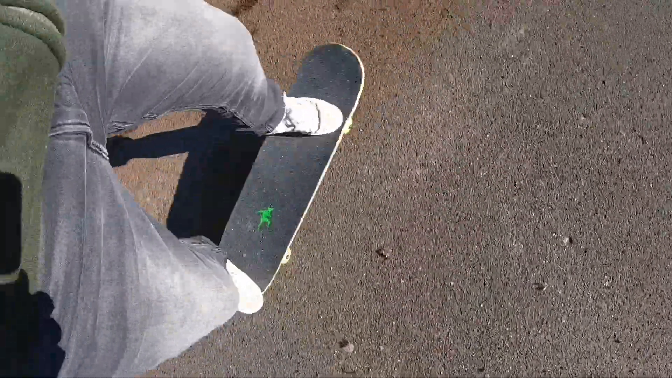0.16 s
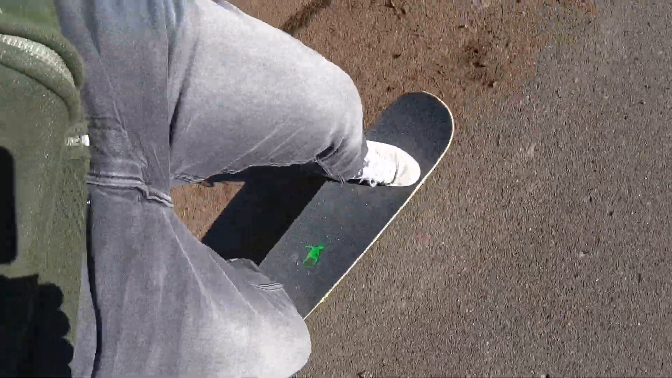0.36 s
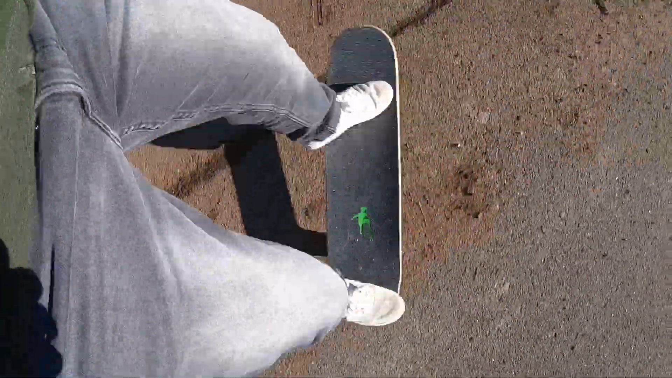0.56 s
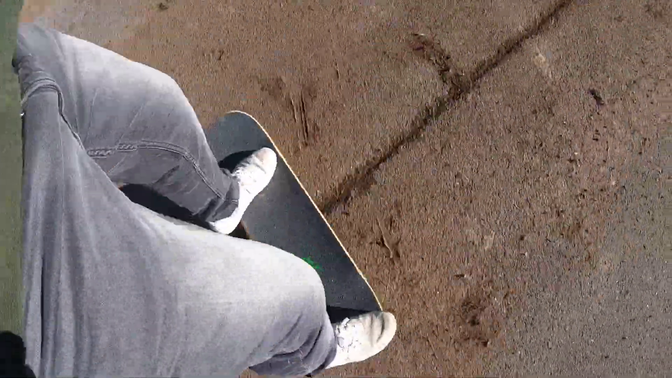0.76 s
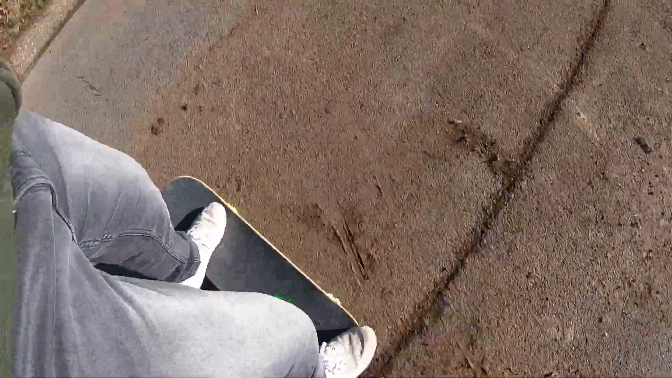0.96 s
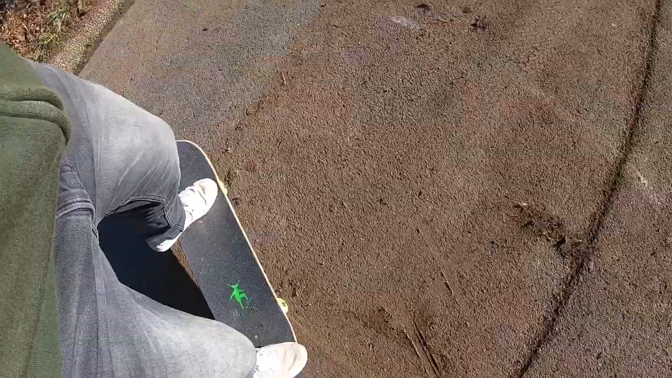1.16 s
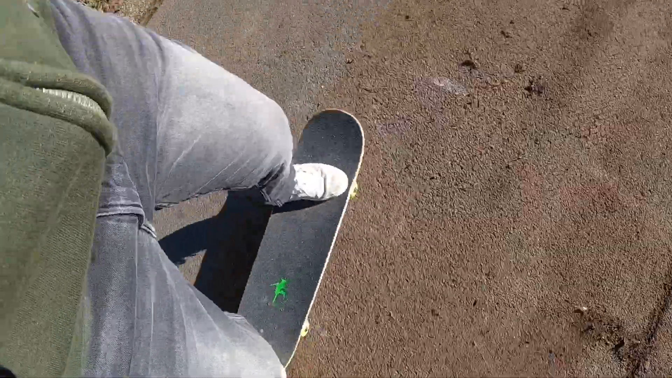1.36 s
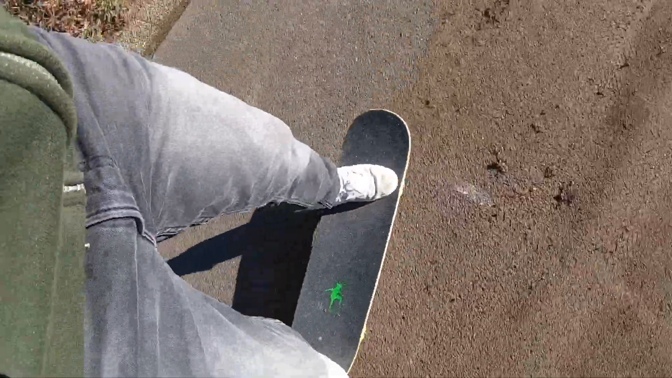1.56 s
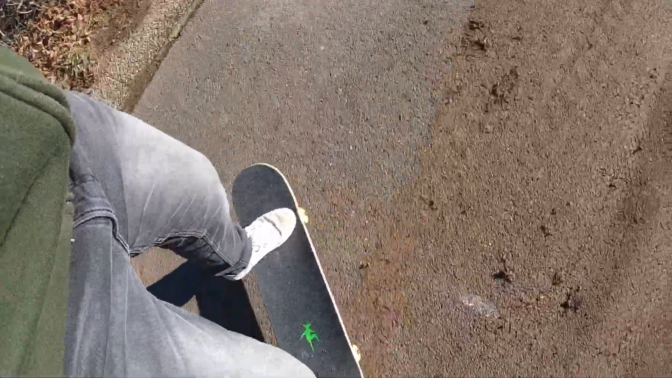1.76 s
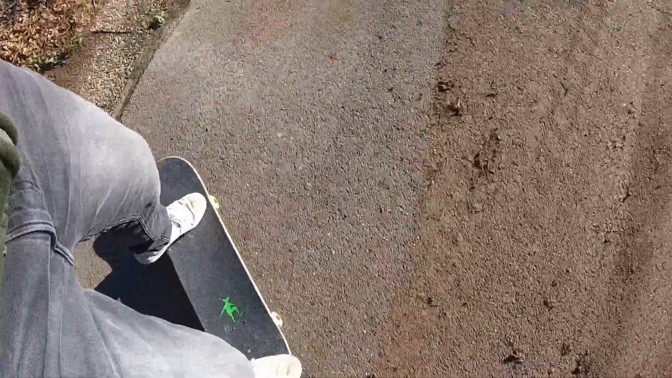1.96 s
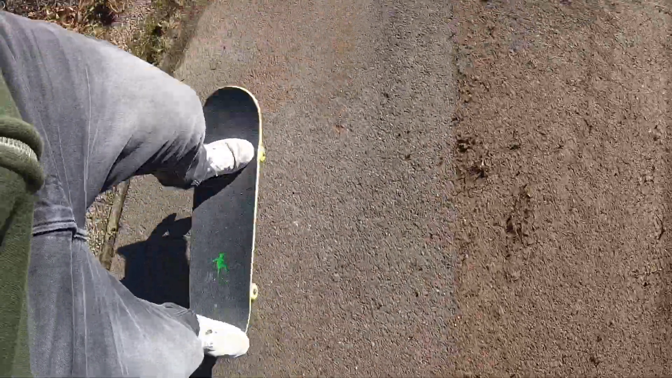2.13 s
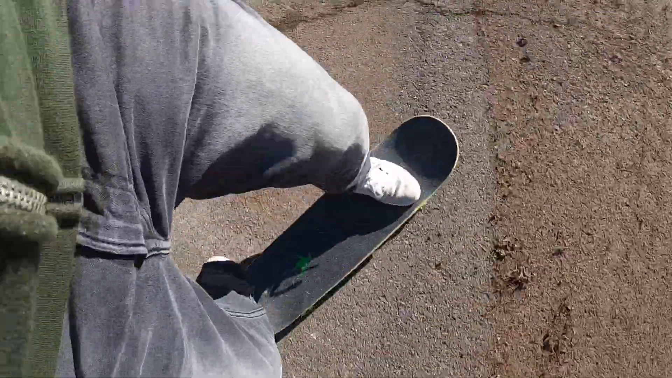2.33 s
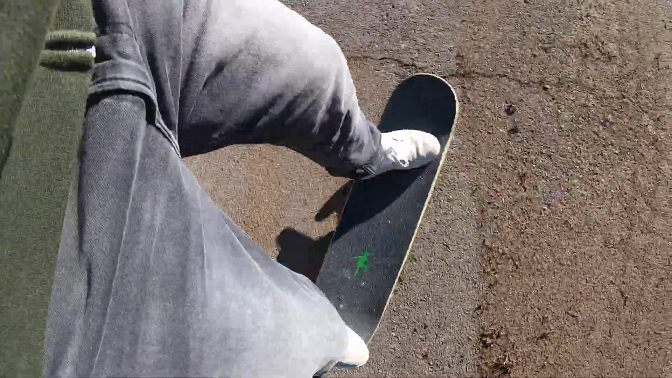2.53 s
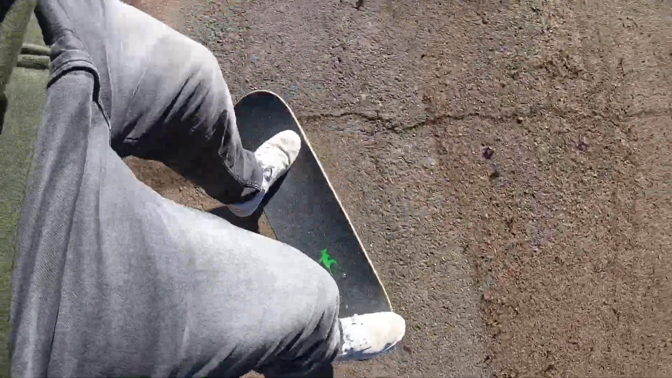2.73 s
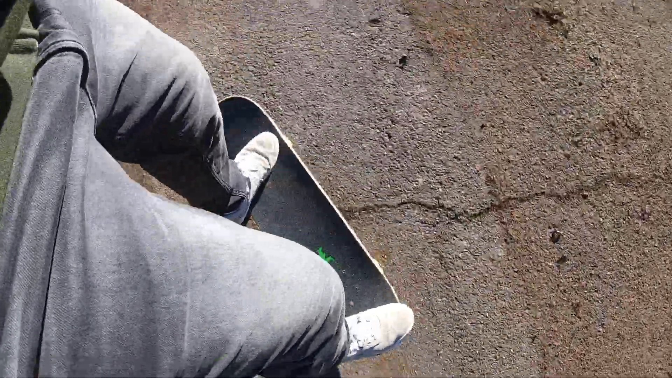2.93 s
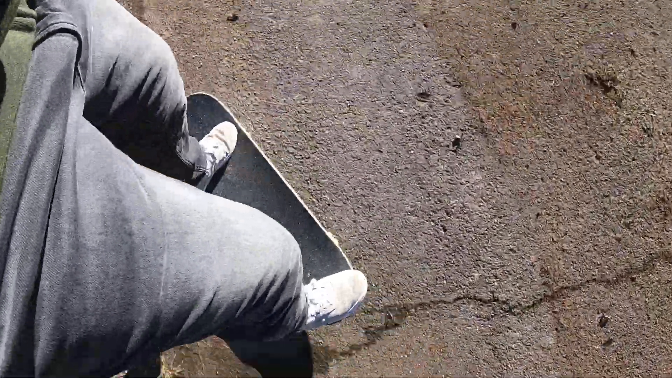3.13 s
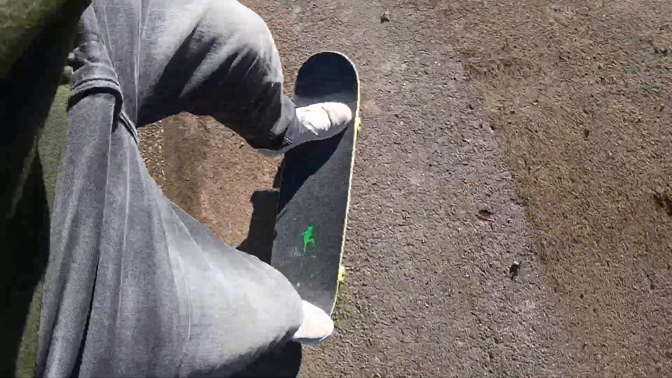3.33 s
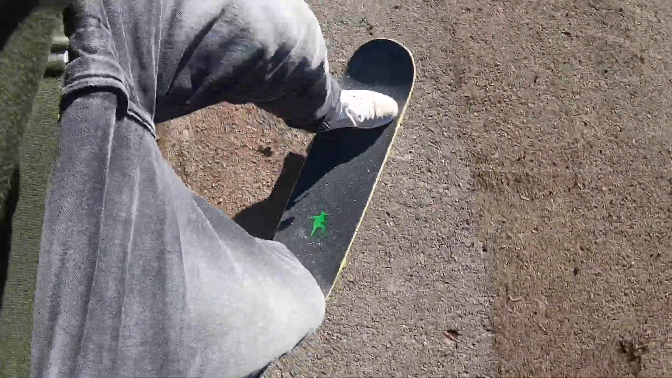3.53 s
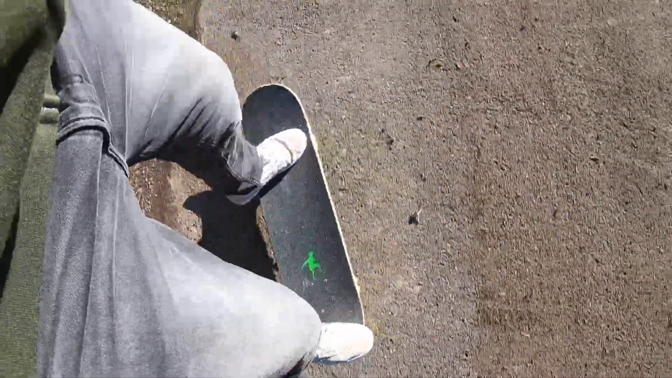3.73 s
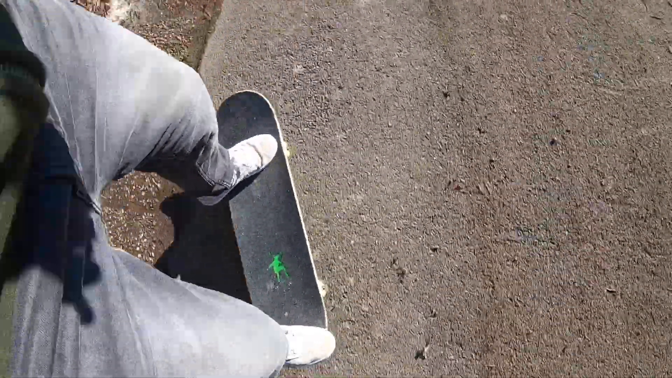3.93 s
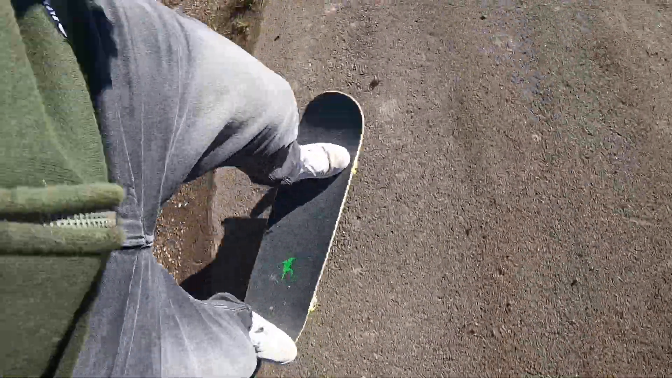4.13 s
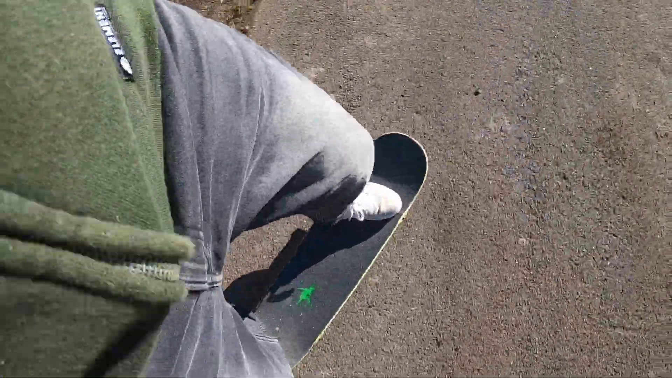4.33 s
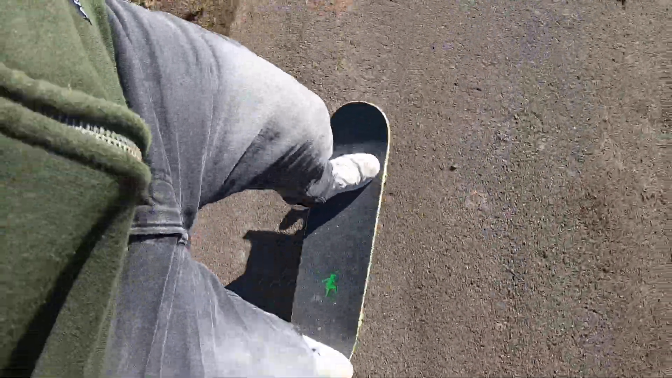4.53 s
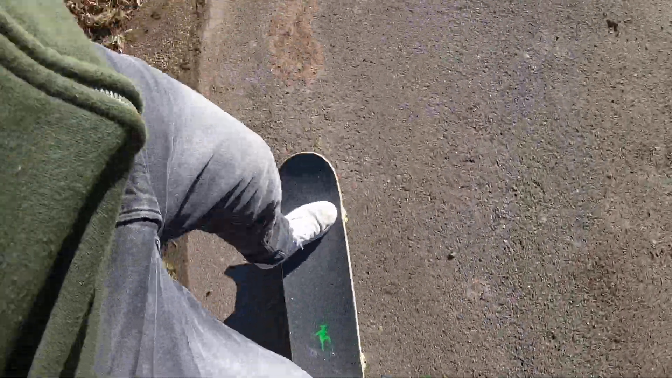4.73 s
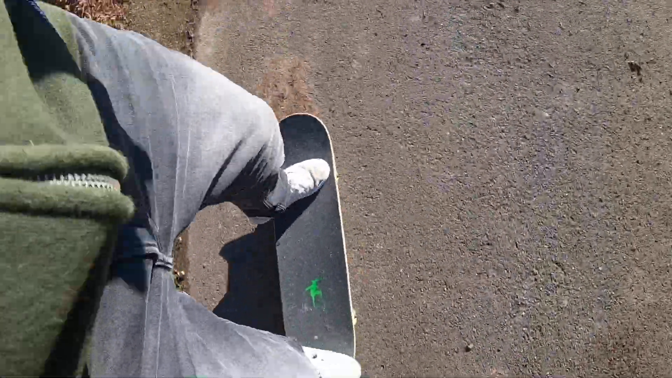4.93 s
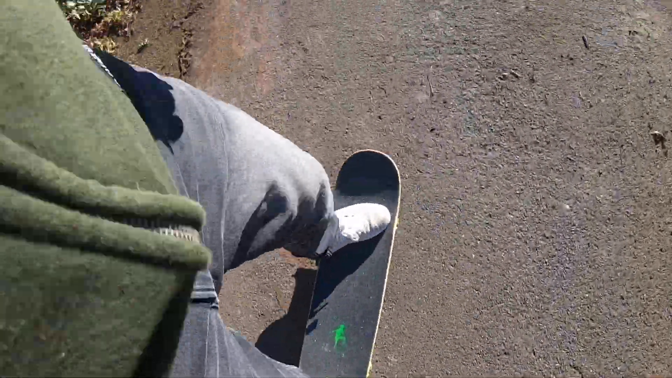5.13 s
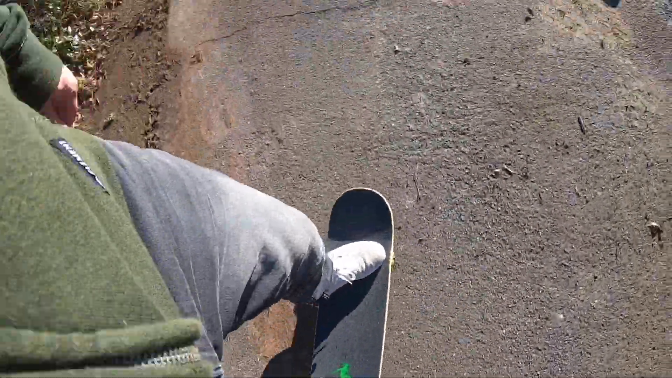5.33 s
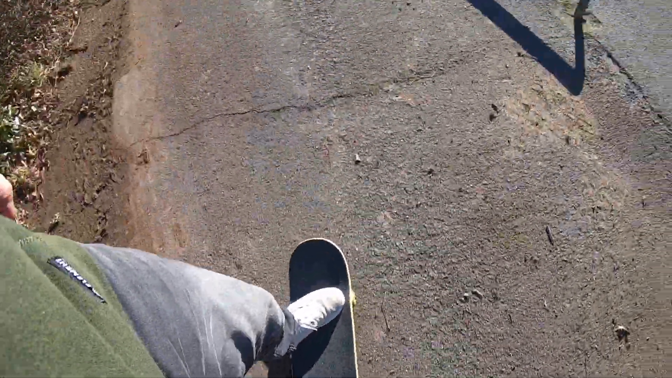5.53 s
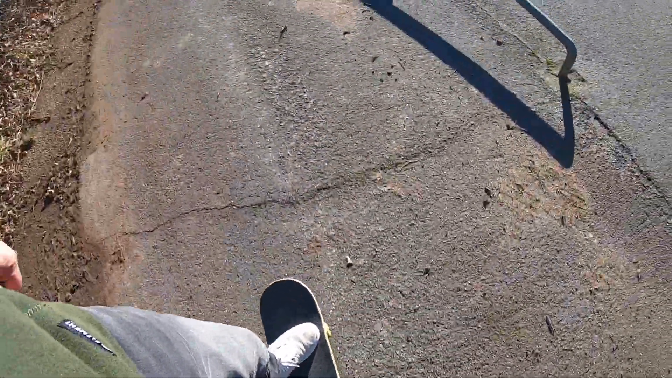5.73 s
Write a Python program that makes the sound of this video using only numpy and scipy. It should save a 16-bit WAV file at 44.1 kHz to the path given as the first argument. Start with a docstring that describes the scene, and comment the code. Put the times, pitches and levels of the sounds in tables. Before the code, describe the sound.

A skateboard is already rolling over rough asphalt, heard outdoors through a close stereo microphone at the rider's chest. The wheels give a low hum while the wooden deck drums over the coarse surface. The sound swells about twice a second as the board carves, rising slightly in pitch with a rasping scrub and a fine crunch of grit. Loose trucks knock and clack between turns, often in quick clusters, at about 0.2, 0.7, 1.4 to 1.8, 2.4, 2.7, 3.4, 3.7, 4.3, 4.6 and 5.1 seconds. Longer carves come around 1, 2 and 3 seconds, the last with a deeper rumble. Small stones tick away now and then, most clearly at 3.6 seconds. Light wind buffets the microphone near 0.3, 1.5 and 5.5 seconds. After about 5.2 seconds the rolling grows softer, with a faint high rub from a wheel.

```python
"""Skateboard carving on rough asphalt

Out on the road, with a close stereo microphone at the rider's chest. The grain of the asphalt bounces
the wheels and drums on the deck; in each turn the wheels scrub and crunch grit. Between turns the load
comes off and the loose trucks knock over to the other side. A little headwind buffets the microphone."""
import sys
import numpy as np
from scipy import signal
from scipy.fft import rfft, irfft, next_fast_len
from scipy.io import wavfile
from scipy.ndimage import uniform_filter1d, map_coordinates

SR = 44100
rng = np.random.default_rng(int(sys.argv[2]) if len(sys.argv) > 2 else 0)


def store_pcm(level_fs):
    """Save levels as 16-bit WAV."""
    pcm = np.round(np.clip(level_fs, -1, 1) * 32767).astype(np.int16)
    wavfile.write(sys.argv[1], SR, np.atleast_2d(pcm).T)


N = 254889


def amp(db):
    """Decibels to gain."""
    return 10 ** (np.asarray(db) / 20)


def unit(x):
    """Scaled to rms 1."""
    return x / np.sqrt(np.mean(x ** 2) + 1e-20)


def along(points, hz):
    """(Hz, value) points joined on a log axis."""
    f, v = np.transpose(points)
    return np.interp(np.log(hz + 1), np.log(f + 1), v)


def wobble(rate):
    """A smooth random curve, rate knots a second."""
    return map_coordinates(rng.standard_normal(int(N * rate / SR) + 4), [np.arange(N) * rate / SR])


def swells(rows):
    """Gain of (peak s, dB, rise s, fall s) swells; rise and fall each span 20 dB."""
    t = np.arange(N) / SR
    return sum(amp(db - 20 * np.maximum((s - t) / rise, (t - s) / fall)) for s, db, rise, fall in rows)


def grains(rate, spread_db):
    """Random contacts of log-normal size, rate a second, as a middle and a side signal of rms 1."""
    size = (rng.random(N) < rate / SR) * amp(spread_db * np.clip(rng.standard_normal(N), -2, 2))
    return unit(size * rng.choice([-1, 1], (2, N)))


def filtered(x, response):
    """x times a complex response of frequency."""
    m = next_fast_len(N + SR // 2, True)
    return irfft(rfft(x, m) * response(np.fft.rfftfreq(m, 1 / SR)), m)[..., :N]


def coloured(x, spectrum, size=4096):
    """Causal filter with the shape of (Hz, dB) points and energy 1."""
    cepstrum = irfft(np.log(amp(along(spectrum, np.fft.rfftfreq(size, 1 / SR)))))
    cepstrum[1:size // 2] *= 2
    cepstrum[size // 2 + 1:] = 0
    kernel = irfft(np.exp(rfft(cepstrum)))
    return signal.oaconvolve(x, kernel[None] / np.linalg.norm(kernel), axes=1)[:, :N]


def resonated(x, modes, cutoff_hz, order):
    """x rings (Hz, width Hz, dB) modes of alternating sign, then is low-passed."""
    def response(hz):
        peaks = sum((-1) ** k * amp(db) * 1j * hz * width / (centre ** 2 - hz ** 2 + 1j * hz * width)
                    for k, (centre, width, db) in enumerate(modes))
        return peaks / (1 + (hz / cutoff_hz) ** order)
    return filtered(x, response)


def steadied(x):
    """Rms 1 with the slow chance swells evened out, as under a steady drive."""
    power = uniform_filter1d(uniform_filter1d(x[0] ** 2, size=2400), size=1600)
    return unit(x / np.sqrt(np.abs(power) + 0.13 * power.mean()))


def patchy(x, depth_db):
    """The colour drifts by depth_db as the contact patches and the rider's legs move."""
    spectra = signal.stft(x, nperseg=512)[2]
    drift = uniform_filter1d(rng.standard_normal(spectra.shape[1:]), size=3, axis=0)
    drift = uniform_filter1d(drift, size=18, axis=1, mode='wrap')
    return unit(signal.istft(spectra * amp(depth_db * unit(drift)), nperseg=512)[1][:, :N])


# Wind right on the microphone. Each row: frequency in Hz, relative level in dB.
WIND_SPECTRUM = [(15, -8), (36, -8), (70, 0), (100, -12.5), (180, -14), (600, -92)]
# Puffs of headwind. Each row: peak time in seconds, level in dB, rise and fall in seconds.
GUSTS = [(.32, -23, 0.028, 0.25), (1.51, -22.5, 0.11, 0.13), (3.93, -39, 0.72, 0.15),
         (4.48, -31.5, 0.21, 0.31), (5.46, -27.5, 0.16, 0.05)]

def headwind(breeze_db=-53):
    """The rider's own headwind flutters on each microphone port, partly on both at once."""
    eddies = rng.standard_normal((2, N)) + 0.25 * rng.standard_normal(N)
    return (amp(breeze_db) + swells(GUSTS)) * steadied(coloured(eddies, WIND_SPECTRUM))


# Pebbles flicked across the road. Each row: start in seconds, pitch in Hz, level in dB.
PEBBLES = [(0.821, 4530, -45), (1.818, 2790, -32.5), (2.807, 3340, -39.5), (3.563, 3290, -24),
           (3.57, 3230, -24), (4.758, 2760, -34.5)]

def pebbles():
    """Loose stones ping away from the wheels."""
    t = np.arange(SR // 10) / SR
    pings = np.zeros((2, N + SR))
    for s, hz, db in PEBBLES:
        rough_phase = np.cumsum(rng.normal(0, .11, (2, len(t))), axis=1)
        envelope = amp(db - 60 * t / 0.032) * (1 - np.exp(-t / 0.0007))
        pings[:, round(s * SR):][:, :len(t)] += envelope * np.sin(2 * np.pi * hz * t + rough_phase)
    return pings[:, :N]


# A wheel's high modes. Each row: frequency and width in Hz, relative level in dB.
WHEEL_MODES = [(4080, 280, 6), (5660, 350, -4.5), (6660, 480, -1)]
# Faint at chest height. Each row: peak time in seconds, level in dB, rise and fall in seconds.
SING_SWELLS = [(5.49, -53, .3, .2), (5.6, -49, .2, .1)]

def wheel_sing(chatter_db):
    """A wheel's edge rubs and sings near the end of the run."""
    ring = resonated(grains(4000, spread_db=7), WHEEL_MODES, cutoff_hz=9000, order=6)
    return swells(SING_SWELLS) * amp(chatter_db) * unit(ring)


# The deck's slowest bending mode. One row: frequency and width in Hz, relative level in dB.
FLEX_MODE = [(107.3, 14, 0)]
# A deep swell underfoot. One row: peak time in seconds, level in dB, rise and fall in seconds.
FLEX_SWELL = [(3.1, -34.5, 0.53, 1)]

def deck_flex(shake, deck_db):
    """The loaded deck sags and springs back between the trucks; otherwise it follows the drumming."""
    level = swells(FLEX_SWELL) + amp(deck_db - 33)
    return level * steadied(resonated(shake, FLEX_MODE, cutoff_hz=220, order=4))


# Fine hiss off the road. Each row: frequency in Hz, relative level in dB.
SAND_SPECTRUM = [(5000, -32), (8300, -11), (9200, -6.5), (10000, -1.5), (11500, -26), (14300, -25),
                 (16000, -32)]

def sand_spray(level_db):
    """A hard carve throws sand."""
    return amp(level_db) * unit(coloured(grains(9000, spread_db=4), SAND_SPECTRUM))


# Bright crunch at road level. Each row: frequency in Hz, relative level in dB.
GRIT_SPECTRUM = [(1500, -54), (3300, 10.5), (4100, 6), (5300, -2.5), (6700, 7), (8200, -13.5), (9400, 3.5),
                 (10300, -7.5), (11600, -28.5), (14300, -25), (16000, -45)]

def grit_crunch(level_db):
    """Loose grit crunches under the wheels in dense, tiny contacts."""
    return amp(level_db) * patchy(coloured(grains(12000, spread_db=6.4), GRIT_SPECTRUM), depth_db=0)


# The tones of a skid. Each row: frequency and width in Hz, relative level in dB.
SKID_MODES = [(1780, 186, -0.5), (2690, 194, -5), (3600, 220, -10.5)]

def wheel_skid(level_db):
    """Urethane slides sideways in a hard carve."""
    slide = resonated(grains(3000, spread_db=1.4), SKID_MODES, cutoff_hz=6000, order=4)
    return amp(level_db) * unit(slide)


# The wheels' rasp, heard from above. Each row: frequency in Hz, relative level in dB.
SCRUB_SPECTRUM = [(200, -10), (400, -22), (780, 6), (890, -16), (1020, -2.5), (1250, 3), (1650, -2.5),
                  (1950, -7), (2600, -8.5), (3050, -15), (3900, -21), (5000, -27.5), (8000, -34.5),
                  (16000, -56.5)]

def wheel_scrub(level_db):
    """The wheels scrub sideways over the asphalt's grain."""
    return amp(level_db) * patchy(coloured(grains(3500, spread_db=5.7), SCRUB_SPECTRUM), depth_db=3)


def stones(scrub_db):
    """Single stones stand proud of the asphalt and tick under the wheels."""
    ticks = coloured(grains(30, spread_db=6), SCRUB_SPECTRUM)
    brightened = filtered(ticks, lambda hz: 1 + 1j * hz / 2600)
    return amp(0.52 * (scrub_db + 34.5) - 47.5) * unit(brightened)


# The maple deck, below the microphone. Each row: frequency and width in Hz, relative level in dB.
DECK_MODES = [(303, 43, -5.5), (524.2, 39.2, 0.5), (618, 67, -3), (721, 51, -2.5), (1170, 294, -19.5)]

def deck_drumming(deck_db, road_db, growl_from_db=-22.5, growl_range_db=3.5):
    """The road drums on the deck; driven hard, it rings in narrower modes and growls."""
    narrow_modes = [(hz, width / 2, db) for hz, width, db in DECK_MODES]
    drum = steadied(resonated(grains(1800, spread_db=1.64), DECK_MODES, cutoff_hz=1500, order=2))
    growl = steadied(resonated(grains(1800, spread_db=4.1), narrow_modes, cutoff_hz=1200, order=2))
    pressed = np.clip((deck_db - growl_from_db) / growl_range_db, 0, 1)
    return amp(deck_db + road_db) * (np.sqrt(1 - pressed) * drum + np.sqrt(pressed) * growl)


# Hanger, washers and wheel cores. Each row: frequency in Hz, relative level in dB, seconds to fall 60 dB.
TRUCK_MODES = [(1060, 0, 0.041), (1320, -20, 0.12), (1470, -17, 0.0077), (1615, 3, 0.051),
               (2048, 11, 0.012), (2180, -6.5, 0.046), (2610, -9, 0.064), (3256, -9, 0.037),
               (3930, -21, 0.031)]
# Truck knocks and stones under a wheel, a leg and torso away. Each row: start in seconds, then
# relative levels in dB of truck clack, wheel thump, deck ring and grit tick.
KNOCKS = [(0.2027, -14.5, -18, -19, -26), (0.251, -17, -11.5, -17, -28.5), (.2605, -15, -38, -12, -26),
          (0.2931, -20, -17, -12.5, -40), (0.516, -15, -17, -30, -34), (0.7257, -13, -10.5, -11.5, -27.5),
          (0.9522, -17, -10.5, -19, -35), (1.385, -14.5, -30, -12.5, -21.5), (1.524, -54, -20, -30, -22),
          (1.5942, -16.5, -37, -9.5, -36), (1.7454, -11, -11.5, -9, -37), (1.759, -13, -15, -12, -27.5),
          (2.3699, -11.5, -15.5, -15, -23), (2.399, -16.5, -15, -14.5, -40), (2.500, -20.5, -22, -11, -42),
          (2.7247, -13, -13.5, -7.5, -34.5), (2.86, -29, -14.5, -27, -36), (3.417, -11, -20, -14, -20),
          (3.731, -9.5, -13.5, -11, -26.5), (3.7608, -16.5, -16, -9, -33), (3.876, -23, -18, -18, -46),
          (4.2518, -12, -25, -11.5, -22.5), (4.292, -29, -15, -11.5, -35), (4.487, -14, -44, -14, -31.5),
          (4.6485, -13.5, -20, -14, -31), (4.654, -16, -10.5, -6, -44),
          (5.1279, -10.5, -22.5, -15.5, -28.5)]

def knocks(thump_hz=192, hollow_hz=745):
    """Each blow clacks the truck, rings the deck and makes the board hop on its wheels."""
    t = np.arange(SR // 4) / SR
    rings, cracks, ticks = np.zeros((3, 2, N + SR))
    fade = lambda t60: amp(-60 * t / t60)
    tone = lambda hz, phase=0: np.sin(2 * np.pi * hz * t + phase)
    scatter_db = lambda: rng.uniform(-2.5, 2.5)
    thump = tone(thump_hz) * fade(0.059) * (1 - np.exp(-t / 0.0023))
    burst = np.exp(-(t / 0.0023) ** 2)  # a brief crunch
    buzz = amp(-12) * fade(.1)  # then the hardware buzzes out
    for s, clack_db, thump_db, deck_db, tick_db in KNOCKS:
        span = slice(round(s * SR), round(s * SR) + len(t))
        contact = 1 - np.exp(-t * amp(clack_db + 12) / 0.00033)  # weaker blows meet more softly
        # a sharp blow favours the higher bending modes
        wood = sum(amp(db + scatter_db()) * (hz / 600) ** 1.17
                   * tone(hz, rng.normal(0, 1)) * np.exp(-np.pi * width * t)
                   for hz, width, db in DECK_MODES)
        # only a hard slap twists the deck and brings out its hollow note
        hollow = amp(2.1 * deck_db + 3) * tone(hollow_hz) * fade(0.047)
        rings[0, span] += contact * (amp(thump_db + 5) * thump + amp(deck_db - 5) * wood + hollow)
        for hz, db, t60 in TRUCK_MODES:  # the point of contact shifts each mode's strength and sign
            strength = rng.choice([-1, 1], (2, 1)) * amp(clack_db - 10.5 + db + scatter_db())
            rings[:, span] += contact * strength * tone(hz * (1 + rng.normal(0, 0.031))) * fade(t60)
        crack, tick = contact * rng.standard_normal((2, 2, len(t)))
        cracks[:, span] += amp(clack_db - 1.5) * crack * (burst + buzz)
        ticks[:, span] += amp(tick_db - 2.5) * tick * (burst + .5 * buzz)
    return rings[:, :N] + coloured(cracks, SCRUB_SPECTRUM) + coloured(ticks, GRIT_SPECTRUM)


def wheel_bounce(shake, pitch_hz, load):
    """The board resonates on its springy wheels; hard-pressed wheels ring more purely."""
    carrier = np.exp(2j * np.pi * np.cumsum(pitch_hz) / SR)

    def ring(width_hz):
        motion = carrier * signal.lfilter([1], [1, -np.exp(-np.pi * width_hz / SR)], shake / carrier)
        # so small a board radiates little deep bass
        radiation = lambda hz: hz ** 6 / (hz ** 6 + 118 ** 6) / (1 + 1j * hz / 600)
        return steadied(filtered(motion.imag, radiation))

    return unit(load * ring(width_hz=10.5) + (1 - load) * ring(width_hz=190))


# Long and short carves down the road, each lasting until the next. Each row: start, peak of the rider's
# weight and peak of the sideways bite in seconds, hold (1 lets go evenly, 4 late), coasting offset in dB,
# top bounce pitch in Hz, then peak levels in dB of bounce, drumming, scrub and grit.
CARVES = [(-.17, 0.123, .16, 1.36, 12, 242, -21.5, -21, -25, -47),
          (0.334, 0.482, .52, 2.04, 1, 227.6, -23.5, -21, -30.5, -59),
          (0.8, 1.044, 1.32, 8.6, 7.5, 237, -28.5, -24.5, -28, -50),
          (1.449, 1.59, 1.61, 0.86, -4, 206, -20, -23, -32, -58),
          (1.831, 2.064, 2.2, 2.7, 0.5, 240, -22.5, -19.5, -24.5, -48),
          (2.425, 2.527, 2.54, 2.53, -1, 228, -27.5, -24, -31.5, -61.5),
          (2.757, 3.107, 3.33, 3.7, -2, 226, -30, -21.5, -29, -52.5),
          (3.479, 3.57, 3.59, 0.94, 2.5, 216, -25, -21.5, -33.5, -57.5),
          (3.85, 3.993, 4.1, 2.2, 7.5, 222.5, -23.5, -22.5, -29.5, -52),
          (4.344, 4.453, 4.49, 1.13, -1.5, 189, -24.5, -23, -34.5, -59),
          (4.725, 4.943, 5.02, 1.62, -4.5, 222, -29.5, -22, -34.5, -56.5),
          (5.22, 5.405, 5.55, 0.62, -1, 170, -27.5, -28.5, -40, -68.5)]
# Brief surges and dips in the wheel hum, deck drumming and scrub. Each row: centre and half length in
# seconds, then the change of each of the three in dB.
SURGES_AND_DIPS = [(0.13, 0.022, 5, -2.5, -1), (.67, 0.014, 5.5, 2.5, 7.5), (0.892, .04, 6.5, 0.5, 3),
                   (1.024, 0.043, 2.5, 4, -5), (1.098, 0.01, 0, 7, 5), (1.27, 0.063, 5, 1, 1.5),
                   (1.872, 0.057, 3.5, 2, 11), (2.166, 0.028, 6, -1.5, 1), (2.242, .025, 4, 1, 1.5),
                   (2.679, 0.017, -2, 5, 8), (2.933, 0.069, 2, 0, 12), (3.076, 0.085, 8, 2, -3.5),
                   (3.616, 0.0078, -3, 3.5, 15), (3.92, 0.028, 6, 0, 0.5), (4.056, 0.018, -6.5, 6, 3.5),
                   (4.201, 0.005, -1, 0.5, 13), (4.87, 0.056, 11, -2, 4.5), (4.999, 0.019, -6, 2, 8),
                   (5.36, 0.081, -1.5, -1, 0.5), (5.601, 0.0125, -8, -5, 8.5)]

def carving(last_end_s=8.34, unloaded_hz=156.5, grit_share=0.45):
    """Each carve is an arch from coasting to its peak and back: four levels in dB and the bounce pitch."""
    t = np.arange(N) / SR
    table = np.array(CARVES)
    starts, offsets_db = table[:, 0], table[:, 4]
    now = np.searchsorted(starts, t) - 1
    start, weight_s, bite_s, hold, _, top_hz, *peaks_db = table.T[:, now]
    end = np.append(starts[1:], last_end_s)[now]

    def arch(peak_s, rise):  # a rise of 1 builds evenly, more builds early
        to_build = np.clip((peak_s - t) / (peak_s - start), 0, 1) ** rise
        released = np.clip((t - peak_s) / (end - peak_s), 0, 1) ** hold
        return 1 - to_build - released

    weight, bite = arch(weight_s, rise=3.1), arch(bite_s, rise=1.54)
    effort = np.array([weight, weight, bite, bite])  # for bounce, drumming, scrub, grit
    coast_db = np.add.outer((-41, -42.5, -49.5, -62.5), np.interp(t, starts, offsets_db))
    change_db = sum(np.outer([hum, drum, scrub, grit_share * scrub], np.exp(-((t - s) / half) ** 2))
                    for s, half, hum, drum, scrub in SURGES_AND_DIPS)
    levels_db = (1 - effort) * coast_db + effort * np.array(peaks_db) + change_db
    # urethane stiffens under the bite, so the wheels bounce faster
    pitch_hz = unloaded_hz + (top_hz - unloaded_hz) * bite ** 1.7
    return levels_db, pitch_hz


def rolling():
    """Asphalt grain shakes wheels and deck; sideways scrub and loose grit add the crunch."""
    (bounce_db, deck_db, scrub_db, grit_db), pitch_hz = carving()
    road_db = 1.1 * wobble(70)  # the asphalt's texture varies from moment to moment
    chatter_db = 2 * wobble(220)  # the wheels catch and slip on single stones
    load = np.clip((pitch_hz - 165) / 55, 0, 1)  # only a loaded wheel skids and throws sand
    shake = grains(1500, spread_db=0.83)
    hum = amp(bounce_db + road_db) * wheel_bounce(shake, pitch_hz, load)
    drum = deck_drumming(deck_db, road_db)
    scrub = wheel_scrub(scrub_db + road_db + chatter_db)
    grit = grit_crunch(grit_db + road_db + chatter_db)
    skid = load * wheel_skid(scrub_db - 10.5 + chatter_db)
    spray = load * sand_spray(grit_db - 7 + 1.1 * chatter_db)
    sing = wheel_sing(chatter_db)
    return hum + deck_flex(shake, deck_db) + drum + scrub + grit + skid + spray + sing + stones(scrub_db)


# The stereo image at the chest. Each row: frequency in Hz, left-right likeness from 0 to 1.
PORT_LIKENESS = [(60, 1), (150, 1), (320, 1), (720, .98), (950, 0.76), (1500, 0.85), (4000, 0.99),
                 (5300, 0.72), (6800, 0.73), (8200, 0.15), (9300, 0.013), (11000, 0.2)]
# Its lean to one side. Each row: frequency in Hz, left minus right in dB.
PORT_BALANCE = [(80, -.5), (180, -.1), (550, .3), (1050, 1.9), (1400, .7), (1950, 3.5), (2500, 1),
                (5200, -1), (6800, 2.5), (8200, 0), (9200, -6), (11000, -5), (12000, 0), (14500, -4)]

def scene():
    """The board reaches two close microphone ports, alike in the bass and unrelated in the top treble."""
    def mid_side_gains(hz):
        angle = np.arccos(np.clip(along(PORT_LIKENESS, hz), -1, 1)) / 2
        return np.array([np.cos(angle), np.sin(angle)])

    mid, side = filtered(rolling() + knocks() + pebbles(), mid_side_gains)
    ports = np.array([mid + side, mid - side])
    board = filtered(ports, lambda hz: amp(np.outer([.5, -.5], along(PORT_BALANCE, hz))))
    return board + headwind()


def record(dry):
    """The recorder rounds the highest peaks and keeps nothing above its band limit."""
    ceiling, top_hz = .8, 15600
    rounded = dry / (1 + np.abs(dry / ceiling) ** 6) ** (1 / 6)
    return filtered(rounded, lambda hz: hz < top_hz)


dry = scene()
out = record(dry)
store_pcm(out)
```